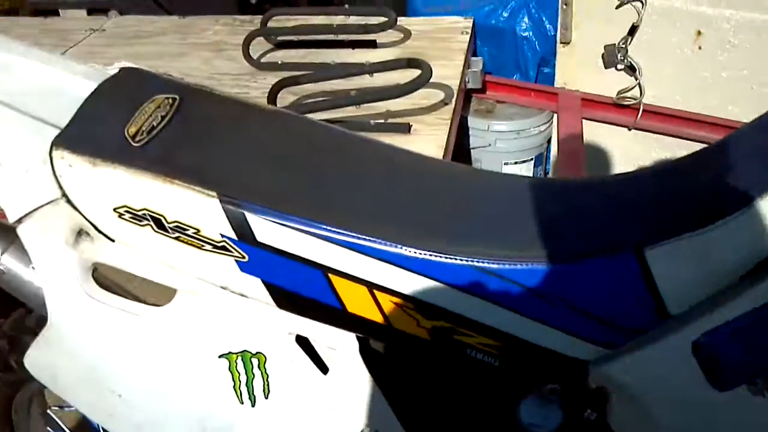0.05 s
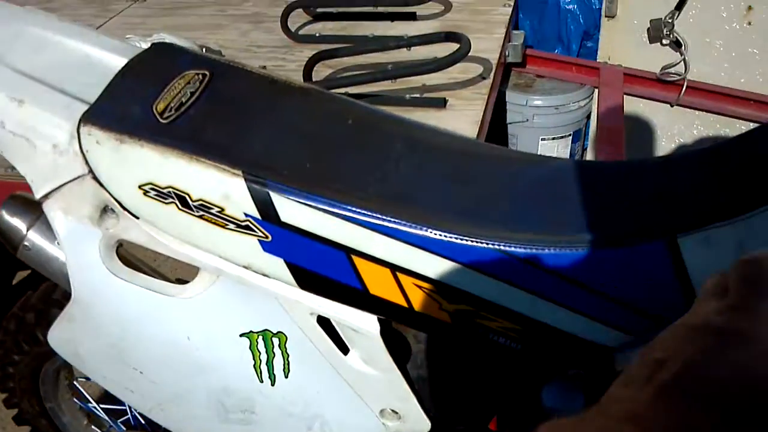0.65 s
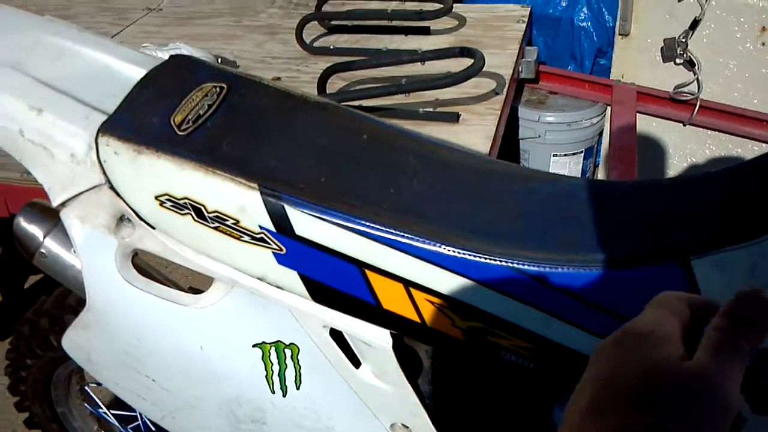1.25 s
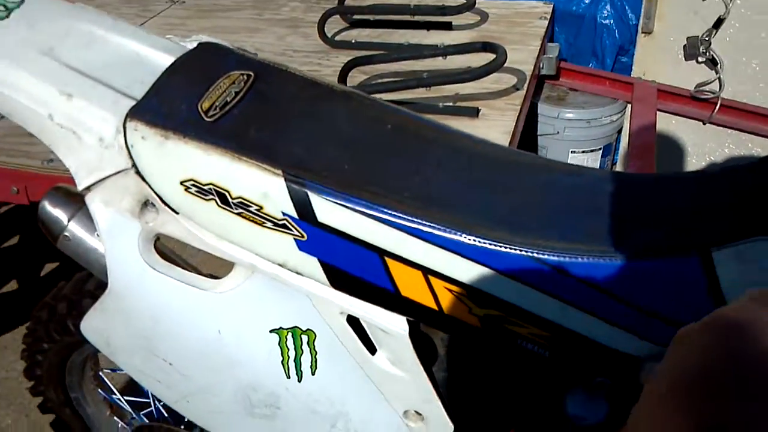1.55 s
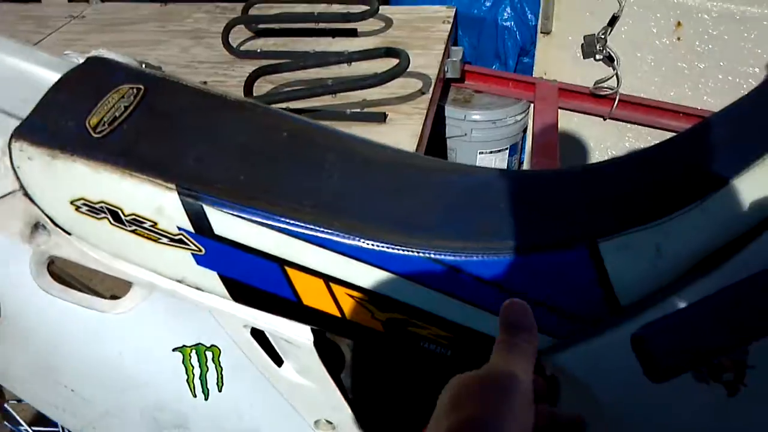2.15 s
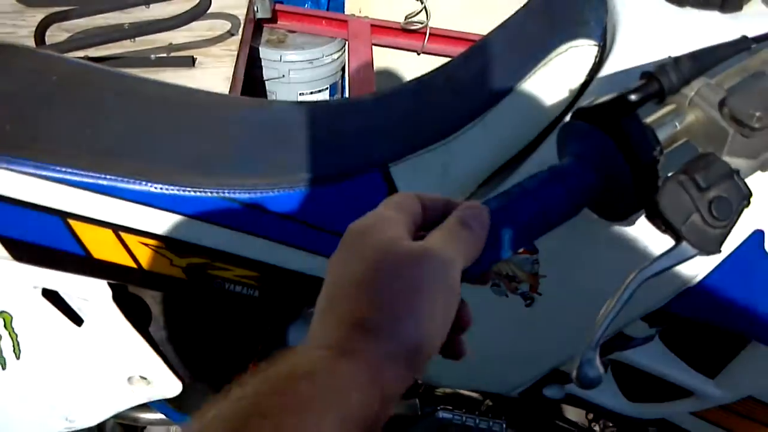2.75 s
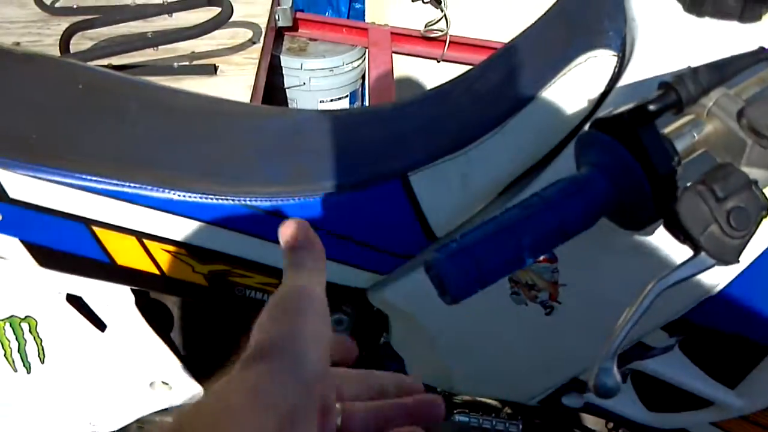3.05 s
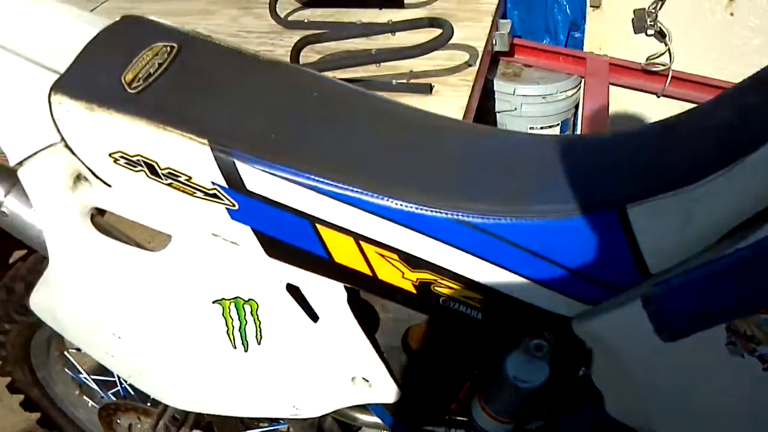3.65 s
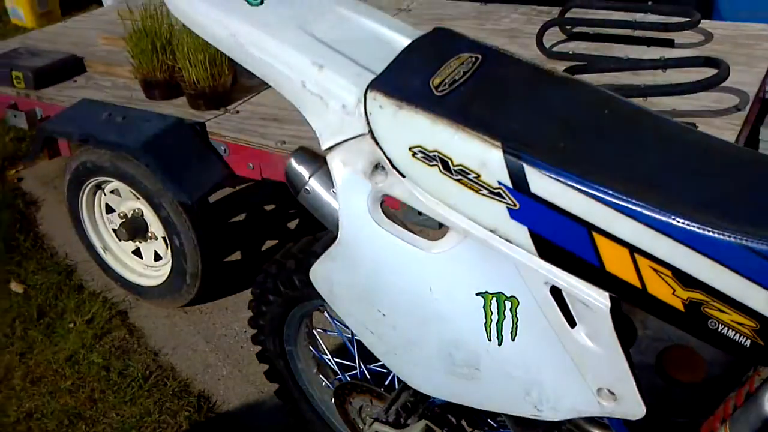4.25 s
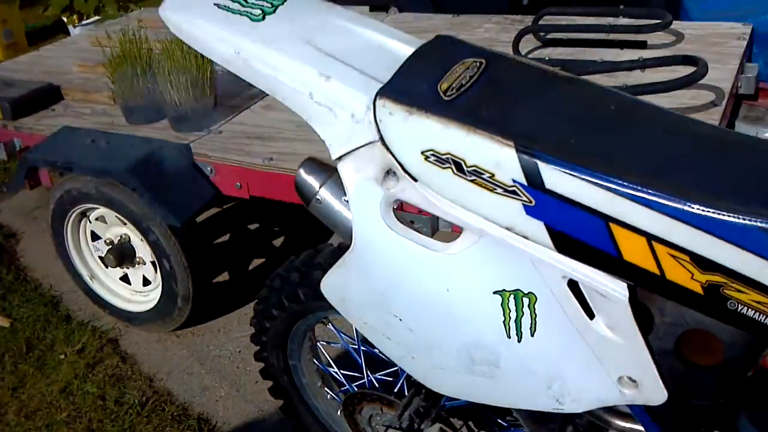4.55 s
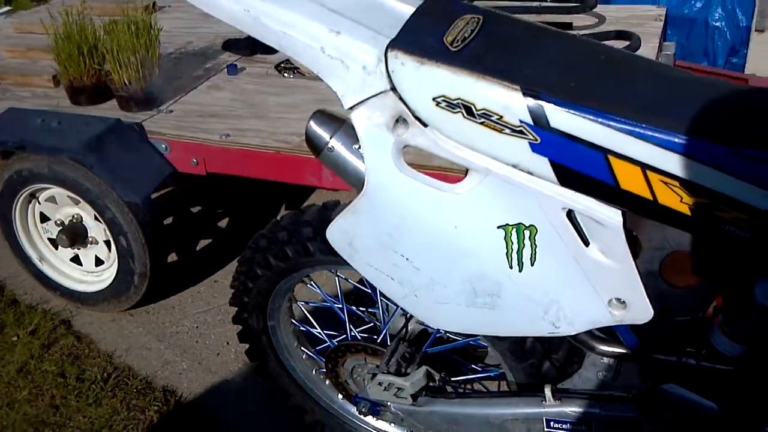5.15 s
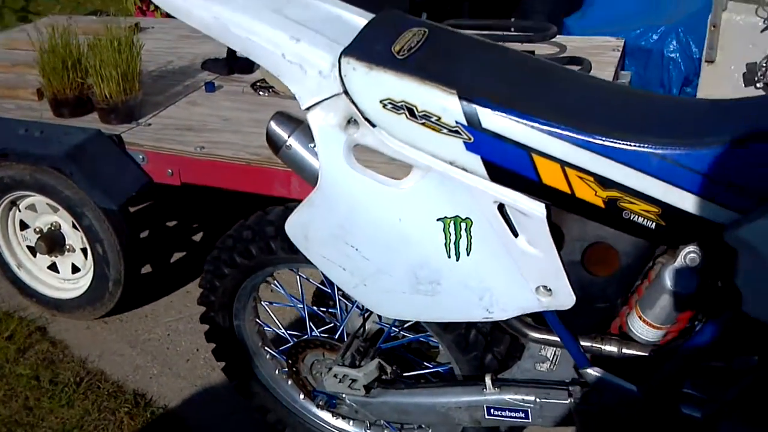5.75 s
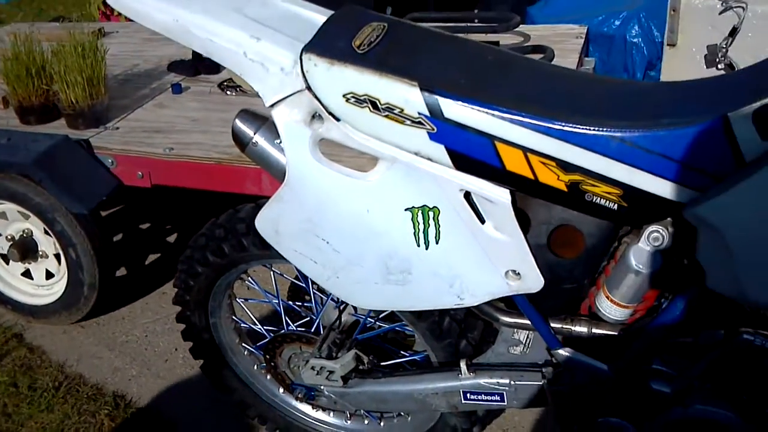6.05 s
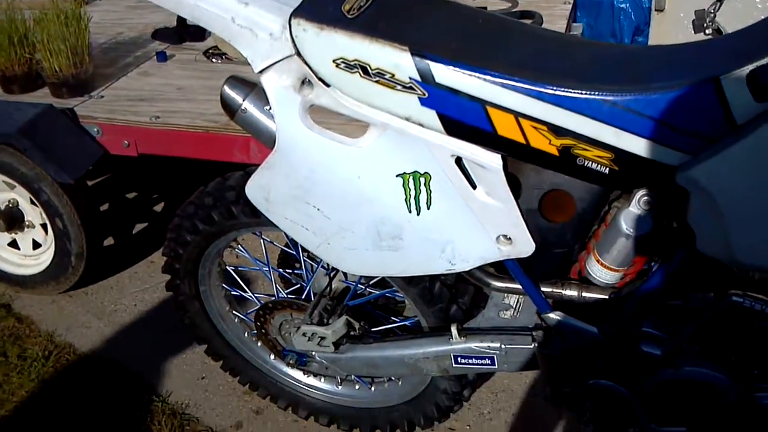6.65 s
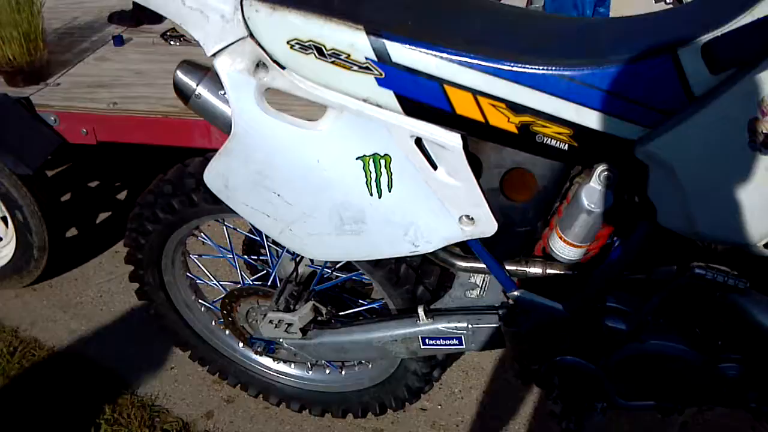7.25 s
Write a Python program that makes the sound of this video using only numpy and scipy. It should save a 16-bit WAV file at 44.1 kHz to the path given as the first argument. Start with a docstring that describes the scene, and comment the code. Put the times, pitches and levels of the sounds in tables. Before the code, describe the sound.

A two-stroke dirt bike sputters at low speed, heard close up from beside the seat outdoors. A small throttle blip is followed by three sharp, loud revs, each with a honking intake and a raspy exhaust crackle. The engine then coasts down with a drone and a hiss from the pipe, ending in a metallic, clattering idle broken by irregular thumping pops.

```python
"""A two-stroke dirt bike stumbles, revs on four throttle blips and sinks to a clattering idle.
One cylinder, heard outdoors from beside the seat. On each blip gulps of air set the airbox honking;
the engine then coasts down, exhaust and cases droning, gas hissing through the pipe.
At idle the piston slaps; soft pops come on every second turn for a while, then only every fifth turn
or so fires, thumping out of the silencer and ringing the pipe."""
import sys
import numpy as np
from scipy import signal
from scipy.fft import rfft, irfft, next_fast_len
from scipy.io import wavfile
from scipy.ndimage import uniform_filter1d

SR = 44100
rng = np.random.default_rng(int(sys.argv[2]) if len(sys.argv) > 2 else 0)


def generate_wav(signal):
    """Clip the signal to [-1, 1] and save it as 16-bit WAV at the path in sys.argv[1]."""
    frames = np.transpose(np.atleast_2d(signal))
    scaled = np.clip(frames, -1, 1) * 32767
    pcm = np.round(scaled).astype(np.int16)
    wavfile.write(sys.argv[1], SR, pcm)


N = 322371
TIME = np.arange(N) / SR

# lone firings: t/s, relative pipe ring/dB, relative thump/dB
LONE_FIRINGS = [(.002, -28.5, -16), (0.19, -27.5, -20), (0.397, -24, -11), (0.506, -54, 5.5),
                (.557, -32, -4), (.591, -29.5, 0), (0.623, -26.5, 2.5), (0.646, -26.5, -19),
                (2.463, -26, -14.5), (3.332, -29, -47), (3.988, -31, -16), (4.178, -42, -13),
                (4.402, -38, -11), (4.54, -24, -8.5), (4.726, -30, -13.5), (4.856, -28.5, -12.5),
                (4.969, -32, -14), (5.063, -40, -16.5), (5.156, -27.5, -11), (5.299, -37, -20),
                (5.323, -43, -15), (5.346, -47, -17.5), (5.446, -44, -15), (6.03, -30, -10.5),
                (6.164, -28, -8), (6.274, -51, -18.5), (6.299, -24, -8), (6.438, -24, -7.5),
                (6.547, -35, -16), (6.717, -25, -8.5), (6.856, -25, -7.5), (7.024, -25, -8),
                (7.191, -22.5, -7)]
# four blips and one faint touch: t/s, hold/s, top crank speed/Hz, coast time constant/s, opening/dB
THROTTLE_BLIPS = [(.535, .12, 66.2, .51, -21), (.92, .11, 105.1, .98, -5.5), (1.851, .089, 104.2, 1.03, -5),
                  (2.455, .035, 81.3, .87, -36), (2.833, .087, 105.8, 1.038, -5)]


def from_db(db):
    """Decibels to gain."""
    return 10 ** (np.asarray(db) / 20)


def in_time(rows):
    """A (t/s, value) curve at every sample."""
    return np.interp(TIME, *np.transpose(rows))


def rms_one(x):
    """Scale to unit power."""
    return x / np.sqrt(np.mean(x ** 2) + 1e-20)


def smoothed(x, span_s):
    """Two moving averages in series."""
    size = int(span_s * SR)
    return uniform_filter1d(uniform_filter1d(x, size), size)


def evened(x, span_s):
    """Hold the running power at one."""
    power = smoothed(rms_one(x) ** 2, span_s)
    return rms_one(x) / np.sqrt(np.abs(power) + 1e-6)


def coloured(x, spectrum):
    """Filter by a curve of (f/Hz, level/dB)."""
    hz, db = np.transpose(spectrum)
    size = next_fast_len(N)
    bins_hz = np.maximum(np.fft.rfftfreq(size, 1 / SR), 1)
    gain = from_db(np.interp(np.log(bins_hz), np.log(hz), db))
    return irfft(rfft(x, size) * gain, size)[:N]


def noise(spectrum):
    """Coloured noise of unit power."""
    return rms_one(coloured(rng.standard_normal(N), spectrum))


def resonate(x, modes):
    """Parallel resonances (f/Hz, width/Hz, level/dB) with alternating signs."""
    out = np.zeros(N)
    for k, (hz, width_hz, db) in enumerate(modes):
        r = np.exp(-np.pi * width_hz / SR)
        poles = [1, -2 * r * np.cos(2 * np.pi * hz / SR), r * r]
        out += (-1) ** k * from_db(db) * (1 - r * r) / 2 * signal.lfilter([1, 0, -1], poles, x + 1e-18)
    return out


def linger(x, decay_s):
    """One-pole lag."""
    r = np.exp(-1 / (decay_s * SR))
    return signal.lfilter([1 - r], [1, -r], x + 1e-18)


def chamber(x, round_trip_s, reflection):
    """All-pass echo: a wave bounces between two ends and leaves in instalments."""
    size = next_fast_len(N + SR // 4)
    trip = np.exp(-2j * np.pi * np.fft.rfftfreq(size, 1 / SR) * round_trip_s)
    return irfft(rfft(x, size) * (trip - reflection) / (1 - reflection * trip), size)[:N]


def each_turn(turns, at_turn, spread_db, jitter_s):
    """One click per crank turn, uneven in strength and timing."""
    chance = rng.standard_normal((600, 2))
    at_s = np.interp(np.arange(len(chance)) + at_turn, turns, TIME, right=np.inf)
    at_s += jitter_s * chance[:, 0]
    heard = (at_s > 0) & (at_s < TIME[-1])
    clicks = np.zeros(N)
    clicks[(at_s[heard] * SR).astype(int)] = from_db(spread_db * chance[heard, 1])
    return clicks


def turbulent(clicks, rough, decay_s):
    """Each pulse trails a puff of noise; rough = puff/pulse rms ratio."""
    return clicks + rough * np.sqrt(linger(clicks ** 2, decay_s)) * rng.standard_normal(N)


def crank_speed():
    """Turns per second: blips wind the crank up, friction slows it, lone firings jolt it at idle."""
    # before the first blip: t/s, crank speed/Hz
    stumble = [(0.0, 29.9), (0.06, 23.7), (0.14, 19.2), (0.2, 28.7), (0.25, 26.7), (0.33, 20.4),
               (0.38, 20.6), (0.41, 30.3), (0.5, 25.7)]
    # settling to idle: t/s, crank speed/Hz
    idle = [(3.98, 59.93), (4.12, 56.2), (4.3, 53.7), (4.6, 48.39), (5.0, 43.03), (5.4, 41.17),
            (5.9, 38.46), (6.3, 36.68), (6.65, 35.66), (7.0, 36.01), (7.31, 34.39)]
    coast_floor_hz, kick_hz, kick_span_s = 34, 9, .15
    crank_hz = in_time(stumble)
    for s, hold_s, top_hz, coast_s, _ in THROTTLE_BLIPS:
        wound_hz = np.interp(TIME, [s, s + hold_s], [crank_hz[int(s * SR)], top_hz])
        coasting = np.exp(-np.maximum(TIME - s - hold_s, 0) / coast_s)
        crank_hz = np.where(TIME > s, coast_floor_hz + (wound_hz - coast_floor_hz) * coasting, crank_hz)
    gained_hz = kick_hz * sum(from_db(thump_db) * (TIME > s) for s, _, thump_db in LONE_FIRINGS)
    lurch_hz = gained_hz - uniform_filter1d(gained_hz, int(kick_span_s * SR))
    return np.where(TIME > idle[0][0], in_time(idle) + lurch_hz, crank_hz)


def exhaust(turns):
    """The port opens once a turn and sends a puff echoing between the pipe's cones."""
    # pipe modes: f/Hz, width/Hz, level/dB
    pipe_modes = [(102, 28, -10), (133, 20, 0), (183.5, 20.6, 3), (242.3, 25, 9.5), (293.4, 17, 6.5),
                  (344, 34, 8), (447, 19.6, 6.5)]
    pulses = each_turn(turns, at_turn=.46, spread_db=1.2, jitter_s=.00004)
    puffs = turbulent(pulses, rough=.14, decay_s=.008)
    pipe = resonate(chamber(puffs, round_trip_s=.0086, reflection=.42), pipe_modes)
    colour = [(40, -36), (70, 0), (100, .5), (500, -6.5), (1500, 2.5), (5000, -71)]
    return evened(coloured(pipe, colour), span_s=.39)


def crankcase(turns):
    """One knock a turn runs together into a drone; each case mode wavers on its own."""
    # case modes: f/Hz, width/Hz, level/dB
    case_modes = [(113.6, 46, 10.5), (499, 45, 6), (545, 34, 4), (618.5, 39, 3.1), (711, 32, 1.5),
                  (791, 36, 0.83), (902, 48, 3), (977, 29, 5.9), (1046, 40, 7.9), (1162, 38, 7.8),
                  (1272, 26, 1.7), (1373, 31, 3), (1470, 35, 4.3), (1625, 50, 4.5), (1685, 50, 5.5)]
    blows = each_turn(turns, at_turn=.27, spread_db=.6, jitter_s=.000012)
    echoing = chamber(turbulent(blows, rough=.08, decay_s=.008), round_trip_s=.0033, reflection=.77)
    cases = np.zeros(N)
    for k, mode in enumerate(case_modes):
        waver_db = 2.2 * rms_one(smoothed(rng.standard_normal(N), span_s=.06))
        cases += (-1) ** k * from_db(waver_db) * resonate(echoing, [mode])
    colour = [(30, -18), (90, -2), (500, 7.5), (1800, -5.5), (6000, -22)]
    return evened(coloured(cases, colour), span_s=.19)


def pipe_nulls(drone):
    """The pipe cancels itself in narrow bands; harmonics fade as they slide through."""
    # anti-resonances: f/Hz, width/Hz
    nulls = [(158, 12), (270, 21), (398, 38)]
    for hz, width_hz in nulls:
        drone = signal.lfilter(*signal.iirnotch(hz, hz / width_hz, fs=SR), drone)
    return drone


def wall_pings(turns, crank_hz, slap_turn):
    """A piston slap draws a short rising ping from the cylinder wall."""
    # wall tones: f/Hz, time to peak/s, level/dB
    tones = [(1603, 0.0027, -3), (3660, 0.0041, -1), (4770, 0.0025, -6.5)]
    flat_share, glide_s = .068, .0033
    since_turns = turns + 1 - slap_turn
    turn, age_s = since_turns.astype(int), (since_turns % 1) / crank_hz
    warped_s = age_s - flat_share * glide_s * (1 - np.exp(-age_s / glide_s))
    out = np.zeros(N)
    for hz, peak_s, db in tones:
        strength, phase = rng.standard_normal((600, 2))[turn].T
        swell = age_s / peak_s * np.exp(1 - age_s / peak_s)
        out += from_db(db + 2.1 * strength) * swell ** 2 * np.sin(2 * np.pi * (hz * warped_s + phase))
    return rms_one(out)


def clatter(turns, crank_hz):
    """The piston slaps one wall, then the other: the finned cylinder rings, loose parts rattle."""
    # cylinder modes: f/Hz, width/Hz, level/dB
    fin_modes = [(667, 22, 8), (744, 79, 4), (888, 31, 7.5), (946, 21, 2), (2249, 28, 9.5), (2760, 62, -25),
                 (2922, 27, 13), (2973, 80, 2.5), (3630, 40, 0.5), (4790, 330, -3), (4900, 49, 5),
                 (6310, 290, -6), (6750, 93, -6)]
    # rattle spectrum: f/Hz, level/dB
    rattle_colour = [(30, -18), (100, 12.5), (400, 17.5), (600, 6), (900, -0.5), (1300, -1.5), (3000, 10),
                     (4600, -5), (5500, -14.5), (9000, -2), (12000, -24), (16000, -26)]
    slap_turn = .19
    slaps = each_turn(turns, at_turn=slap_turn, spread_db=1, jitter_s=.0001)
    slaps += each_turn(turns, at_turn=.33, spread_db=.5, jitter_s=.0005)
    rattle = np.sqrt(linger(linger(slaps ** 2, .001), .004)) * rng.standard_normal(N)
    rattle = from_db(1) * rms_one(coloured(rattle, rattle_colour))
    fins = rms_one(resonate(turbulent(slaps, rough=1.3, decay_s=.003), fin_modes))
    pings = from_db(-9) * wall_pings(turns, crank_hz, slap_turn)
    return evened(fins + rattle + pings, span_s=.93)


def pipe_hiss(turns, crank_hz):
    """Gas rushes through the thin steel chamber in pulses; the shell rings more at speed."""
    # shell modes: f/Hz, width/Hz, level/dB
    shell_modes = [(3170, 52, 8.5), (3630, 150, -15.5), (4700, 200, -1.5), (5400, 100, -40),
                   (6180, 200, -1.5), (7430, 100, -23), (9760, 40, 12.5), (11500, 67, 0), (13500, 180, -7),
                   (14700, 120, -6)]
    # gas flow spectrum: f/Hz, level/dB
    gas_colour = [(60, -39), (150, -34), (300, 1), (700, 2.5), (1130, 4), (1400, -1), (1900, 1.5),
                  (3200, 2.5), (4600, 2.5), (5600, 0), (8000, 0.5), (9800, -1), (11800, -1), (13500, -9.5),
                  (16000, -17)]
    # slow swell of the hiss: t/s, level/dB
    trend = [(0, -2.5), (.85, -2.5), (1.3, -1), (3.3, 0.2), (5.3, 3.5), (7.3, -2)]
    pulses = each_turn(turns, at_turn=.13, spread_db=5, jitter_s=.00018)
    surge = evened(np.sqrt(linger(pulses, .03)), span_s=.14)
    shell = rms_one(resonate(rng.standard_normal(N), shell_modes))
    shell_gain = from_db(-7) * (crank_hz / crank_hz.max()) ** 1.25
    return from_db(in_time(trend)) * surge * (noise(gas_colour) + shell_gain * shell)


def engine_knocks(turns, turn_gain):
    """Sharp clacks: one on each slow turn, a combustion knock just before each firing, and a few strays
    between."""
    # stray knocks: t/s, relative level/dB
    strays = [(0.494, -10.5), (6.683, -15), (6.958, -21), (7.099, -17)]
    lead_s, rise_s, fade_s = .0055, .0007, .006
    blows = turn_gain * each_turn(turns, at_turn=.274, spread_db=2.5, jitter_s=.00028)
    for s, ring_db, _ in LONE_FIRINGS:
        blows[int(max(s - lead_s, 0) * SR)] += from_db(ring_db + 14.5)
    for s, db in strays:
        blows[int(s * SR)] += from_db(db)
    clacks = fade_s * SR * linger(linger(blows, rise_s), fade_s)
    colour = [(40, -35), (150, 9), (500, -1.5), (1200, -11), (2000, -16), (4000, -11.5),
              (7000, -20.5), (12000, -17), (16000, -45)]
    return from_db(-4.5) * clacks * noise(colour)


def silencer_thumps(firings):
    """Each firing leaves the silencer as a round, rising thump; stronger ones bark lower."""
    # thump tones: nominal f/Hz, time to peak/s, level/dB
    tones = [(144, 0.0092, -12.5), (238.6, 0.019, -10.5), (375.7, 0.011, 0.5), (495.3, 0.022, -16)]
    drop_share, stray_share, flat_share, glide_s = .115, .026, .579, .0076
    thumps = np.zeros(N)
    for s, _, thump_db in firings:
        near = (TIME > s) & (TIME < s + .2)
        age_s = TIME[near] - s
        pitch = (1 - drop_share * from_db(thump_db)) * (1 + stray_share * rng.standard_normal())
        warped_s = np.cumsum(pitch * (1 - flat_share * np.exp(-age_s / glide_s))) / SR
        for hz, peak_s, db in tones:
            swell = (age_s / peak_s * np.exp(1 - age_s / peak_s)) ** 2.5
            thumps[near] += from_db(thump_db + db) * swell * np.sin(2 * np.pi * hz * warped_s)
    return from_db(-3) * thumps


def pipe_ring(firings, burn):
    """Each firing leaves the pipe wall ringing; under throttle the rings merge."""
    # pipe wall spectrum: f/Hz, level/dB
    wall_colour = [(200, -2), (900, -10), (1500, 3), (3200, 2), (5000, 5.5), (7500, 7), (11000, 11),
                   (13000, 7.5), (16000, 3)]
    rise_s, fade_s = .0045, .017
    power = linger(linger((from_db(-17.5) * burn) ** 2, .01), .0095)
    for s, ring_db, _ in firings:
        near = (TIME > s) & (TIME < s + .2)
        age_s = TIME[near] - s
        ring = (1 - np.exp(-(age_s / rise_s) ** 2)) * np.exp(-age_s / fade_s)
        power[near] += (from_db(ring_db) * ring / ring.max()) ** 2
    return from_db(8.5) * np.sqrt(power) * noise(wall_colour)


def throttle_opening():
    """The slide lifts just before the crank responds, holds, then snaps shut."""
    lead_s, open_s, shut_s = .0063, .032, .0012
    opening = np.zeros(N)
    for s, hold_s, _, _, db in THROTTLE_BLIPS:
        lift = 1 - np.exp(-np.maximum(TIME - s + lead_s, 0) / open_s)
        opening += from_db(db) * lift * np.exp(-np.maximum(TIME - s - hold_s, 0) / shut_s)
    return opening


def airbox_honk(turns, throttle):
    """With the slide open, each gulp of air rings the airbox."""
    # airbox modes: f/Hz, width/Hz, level/dB
    box_modes = [(131, 120, -11), (241, 68, 8), (324, 90, 7.5), (492, 80, 0.5), (614, 100, -9.5),
                 (1090, 660, -18), (1630, 730, -18)]
    gulps = each_turn(turns, at_turn=.4, spread_db=2.5, jitter_s=.0002)
    honk = resonate(turbulent(gulps, rough=.5, decay_s=.006), box_modes)
    colour = [(30, 4), (150, 10), (1800, -7.5), (4000, -27)]
    return from_db(4.5) * throttle * evened(coloured(honk, colour), span_s=.0047)


def silencer_crackle(turns, throttle):
    """Under throttle every turn fires and cracks out of the silencer."""
    # crack spectrum: f/Hz, level/dB
    crack_colour = [(300, -20), (600, 0), (1100, 2), (1500, -1), (2200, -9), (4000, -25), (8000, -40)]
    pulses = each_turn(turns, at_turn=.52, spread_db=1, jitter_s=.00018)
    cracks = evened(np.sqrt(linger(pulses ** 2, .0041)), span_s=.02)
    return from_db(-21) * throttle * cracks * noise(crack_colour)


def tinny_ring(turns, crank_hz):
    """A thin metal part shakes, most at one crank speed just above idle."""
    peak_hz, peak_db, one_db_down_hz = 45, -31.5, 2.5
    taps = each_turn(turns, at_turn=.0989, spread_db=3, jitter_s=.00032)
    modes = [(1478, 26, 2.1), (1640, 130, 1.4), (2890, 35, 7)]
    ring = resonate(turbulent(taps, rough=1, decay_s=.0042), modes)
    shake_db = peak_db - ((crank_hz - peak_hz) / one_db_down_hz) ** 2
    return from_db(shake_db) * evened(ring, span_s=.31)


def gear_whine(turns, teeth=21):
    """The primary gear's mesh tone swells as it slides through each case panel's resonance."""
    # panel modes: f/Hz, width/Hz, level/dB
    panel_modes = [(920, 140, -4), (1155, 150, 0), (1720, 30, -4)]
    return from_db(-38.5) * resonate(np.sin(2 * np.pi * teeth * turns), panel_modes)


def four_stroking(turns, start_s=5.494, count=10):
    """Soft, growing pops on every second turn; rows as in LONE_FIRINGS."""
    ring_db, thumps_db = -47, np.linspace(-17, -10, count)
    pop_turns = np.interp(start_s, TIME, turns) + 2 * np.arange(count)
    return [(s, ring_db, db) for s, db in zip(np.interp(pop_turns, turns, TIME), thumps_db)]


def stereo_blur(bike, t60_s=.038):
    """A faint, short diffuse tail, different in each channel, slightly widens the sound."""
    age_s = TIME[:SR // 8]
    tails = rng.standard_normal((2, len(age_s))) * from_db(-60 * age_s / t60_s)
    tails /= np.sqrt(np.sum(tails ** 2, axis=1, keepdims=True))
    bright = coloured(bike, [(400, -2), (1200, -1.5), (3000, -3)])
    return from_db(-17) * signal.fftconvolve(bright[None], tails, axes=1)[:, :N]


def microphone_ports(bike, lag_s=16 / SR):
    """Two ports: the left slightly quieter, the right a moment later."""
    # left port against right: f/Hz, level/dB
    left_colour = [(100, -3), (1000, -3), (4000, -1.5), (14000, -2.5)]
    return np.array([coloured(bike, left_colour), np.interp(TIME - lag_s, TIME, bike)])


def scene():
    """One crank drives the engine's sources; speed and throttle set their levels."""
    # relative levels: crank speed/Hz, exhaust/dB, crankcase/dB, clatter/dB, hiss/dB, knock/dB
    by_speed = [(20.4, -22.5, -27, -36.5, -29, -10), (28.5, -21, -26, -28.5, -28, -26),
                (34.8, -23, -53, -23, -27, -63), (38.1, -23, -67, -22.5, -29.5, -29),
                (41.3, -26.5, -38, -25.5, -33, -50), (49.6, -25, -30.5, -32.5, -31.5, -55),
                (60.4, -24.5, -30, -32.5, -29.5, -60), (72, -28, -26.5, -28.5, -25, -60),
                (81.7, -31, -24, -32, -22, -60), (98.6, -21, -23.5, -39, -20.5, -62),
                (101, -18.5, -23, -23, -22, -60)]
    crank_hz, throttle = crank_speed(), throttle_opening()
    turns = np.cumsum(crank_hz) / SR
    speeds_hz, *levels_db = np.transpose(by_speed)
    exhaust_db, case_db, clatter_db, hiss_db, knock_db = [
        np.interp(crank_hz, speeds_hz, db) for db in levels_db]
    burn = throttle * (crank_hz / crank_hz.max()) ** 2  # more firings a second burn more fuel
    hush_db = -8 * np.minimum(throttle / from_db(-43), 1)  # clatter and knocks duck on open throttle
    firings = LONE_FIRINGS + four_stroking(turns)

    drone = from_db(exhaust_db + .5) * exhaust(turns)
    drone += (from_db(case_db) + from_db(-23) * burn) * crankcase(turns)
    bike = pipe_nulls(drone)
    bike += from_db(clatter_db + hush_db) * clatter(turns, crank_hz)
    bike += from_db(hiss_db) * pipe_hiss(turns, crank_hz)
    bike += airbox_honk(turns, throttle) + silencer_crackle(turns, throttle)
    bike += tinny_ring(turns, crank_hz) + gear_whine(turns)
    bike += engine_knocks(turns, from_db(knock_db + 2 * hush_db))
    bike += silencer_thumps(firings) + pipe_ring(firings, burn)
    return microphone_ports(bike) + stereo_blur(bike)


def record(dry):
    """Left polarity reversed, soft overload on the blips, steep treble cut."""
    cutoff_hz = 15700
    wired = dry * [[-1], [1]]
    clipped = wired / (1 + wired ** 8) ** (1 / 8)
    return signal.sosfilt(signal.ellip(12, .1, 80, cutoff_hz, fs=SR, output="sos"), clipped)


dry = scene()
out = record(dry)
generate_wav(out)
```